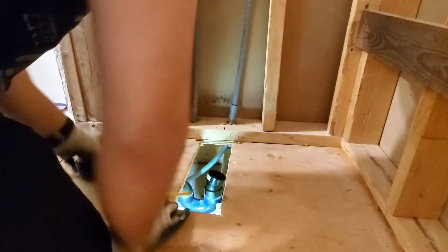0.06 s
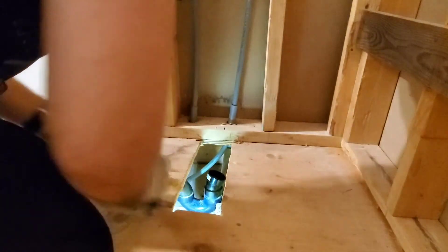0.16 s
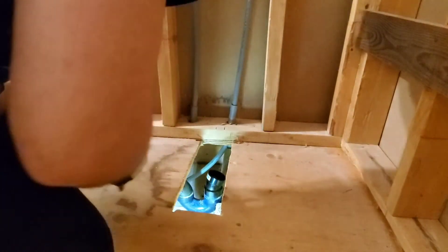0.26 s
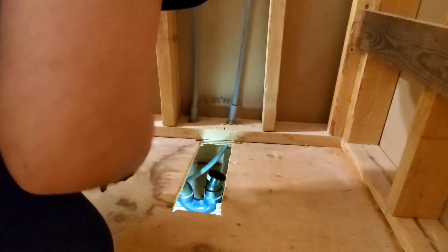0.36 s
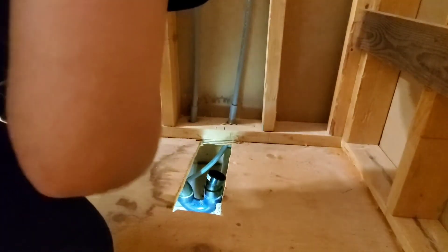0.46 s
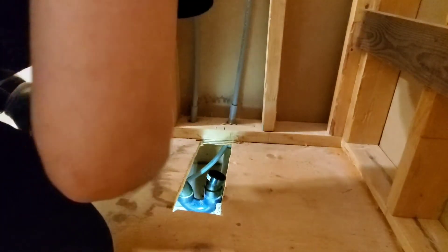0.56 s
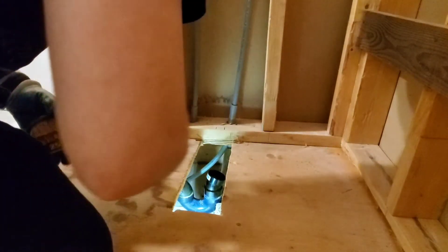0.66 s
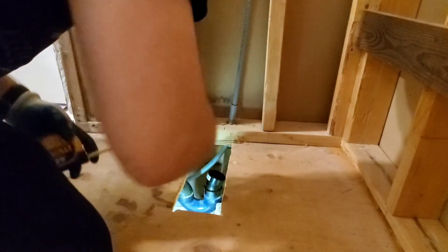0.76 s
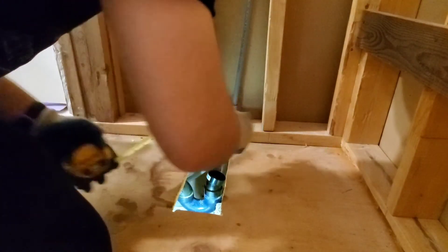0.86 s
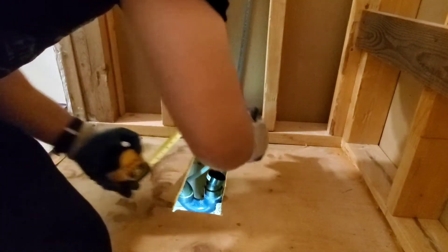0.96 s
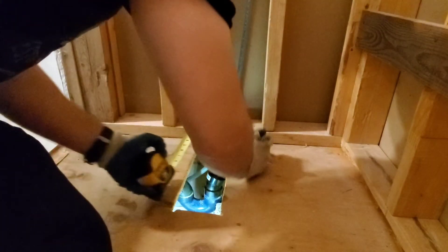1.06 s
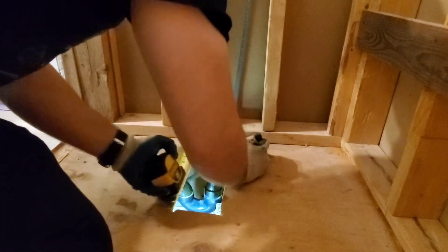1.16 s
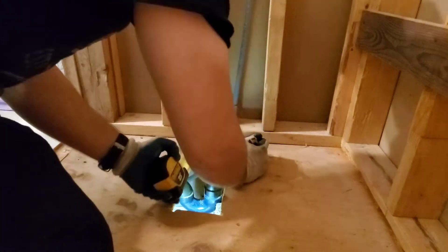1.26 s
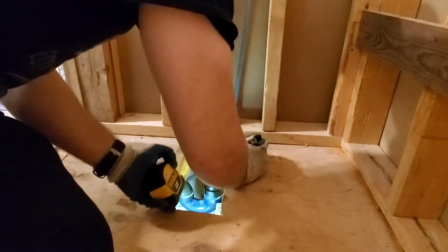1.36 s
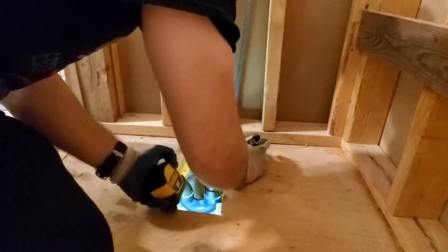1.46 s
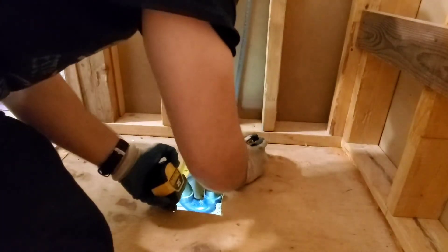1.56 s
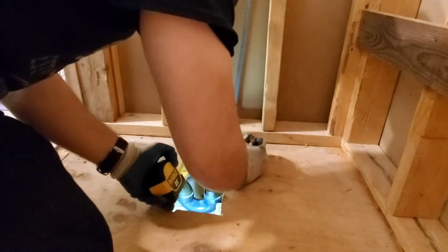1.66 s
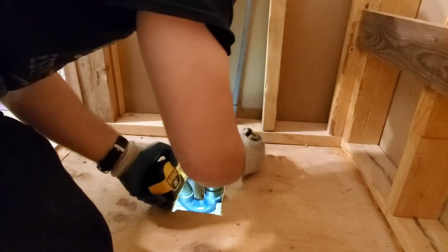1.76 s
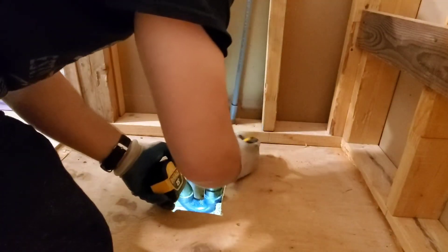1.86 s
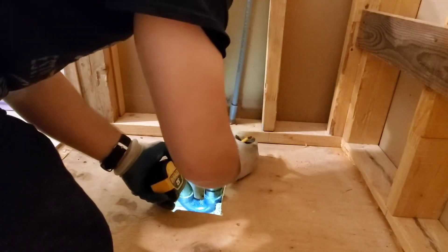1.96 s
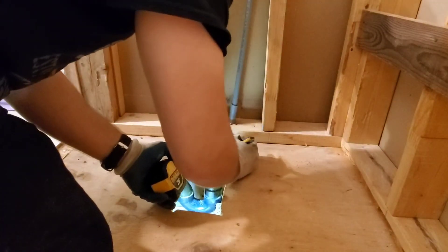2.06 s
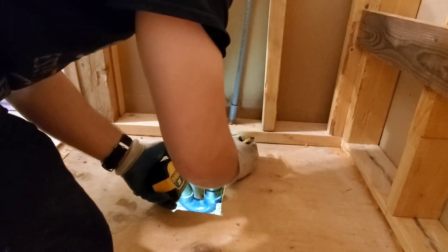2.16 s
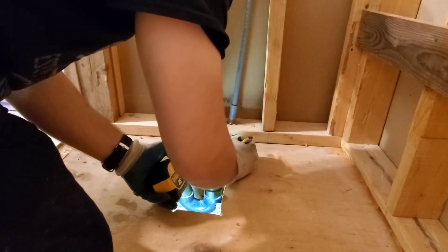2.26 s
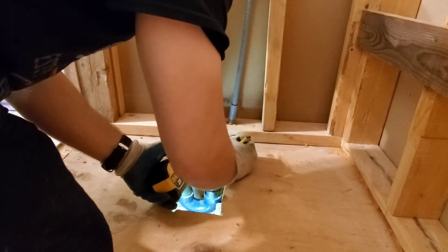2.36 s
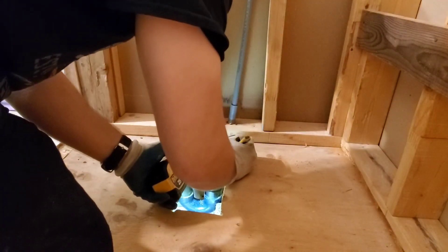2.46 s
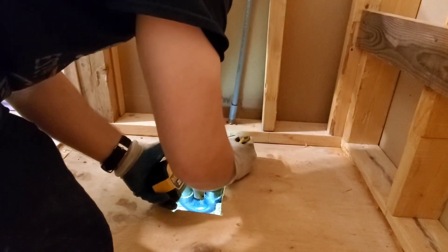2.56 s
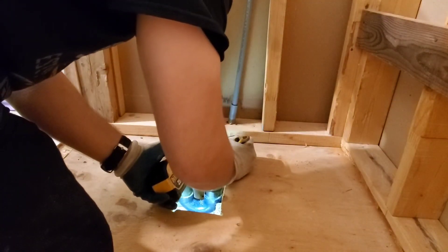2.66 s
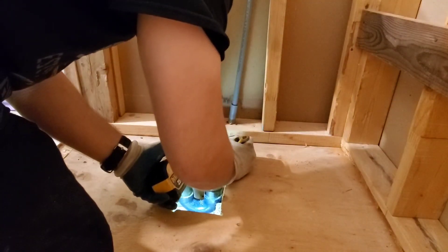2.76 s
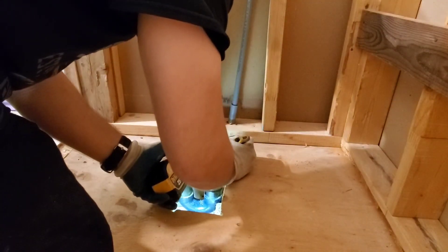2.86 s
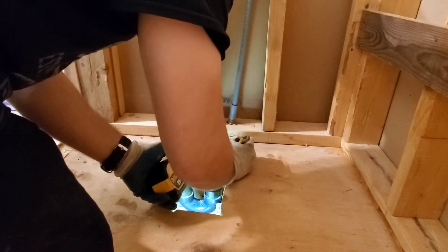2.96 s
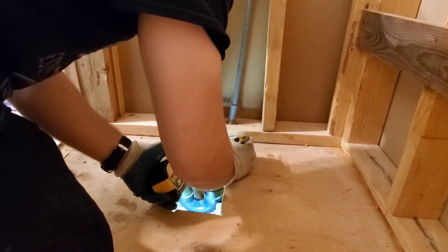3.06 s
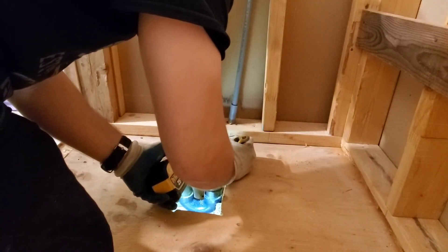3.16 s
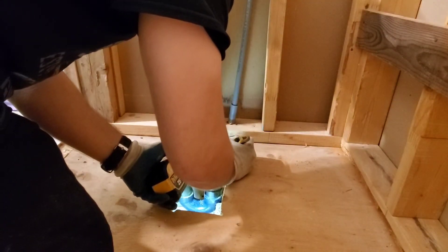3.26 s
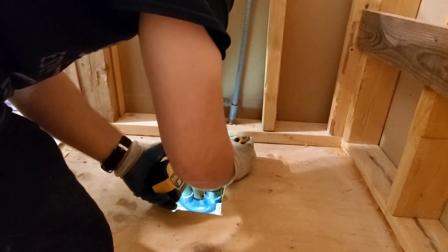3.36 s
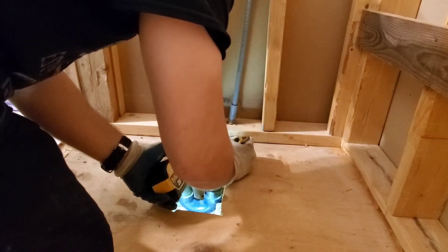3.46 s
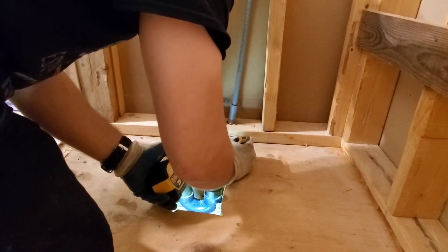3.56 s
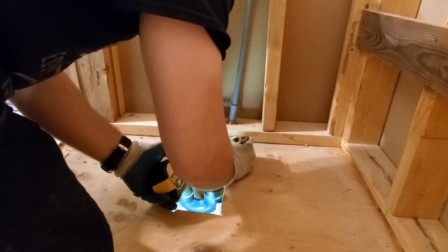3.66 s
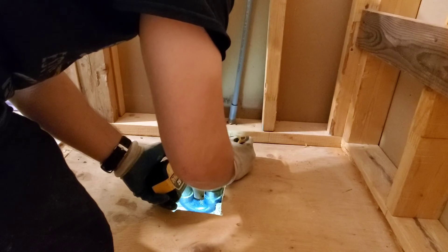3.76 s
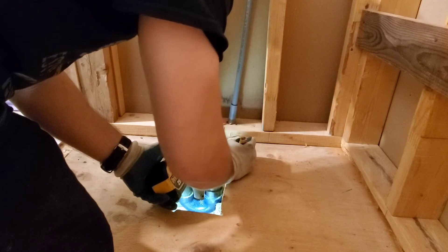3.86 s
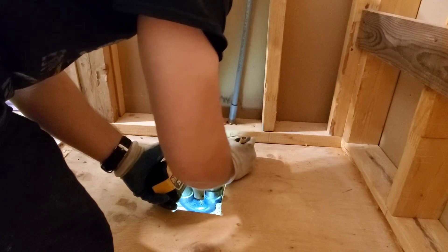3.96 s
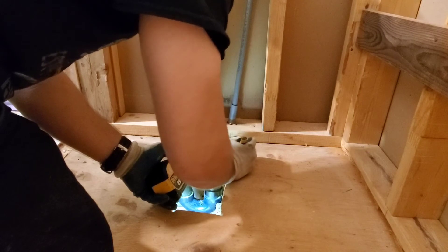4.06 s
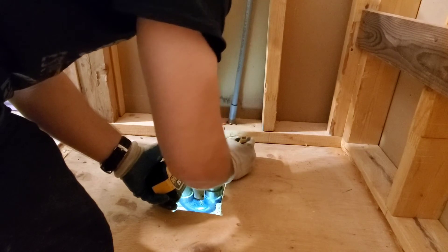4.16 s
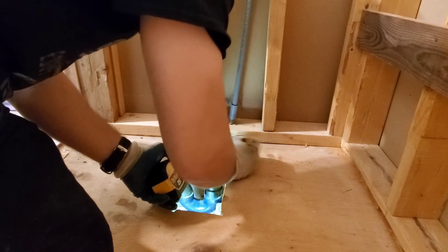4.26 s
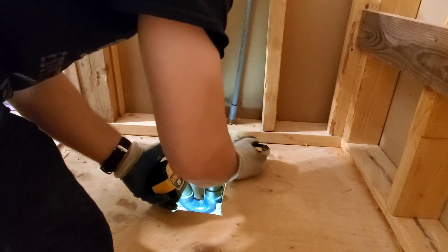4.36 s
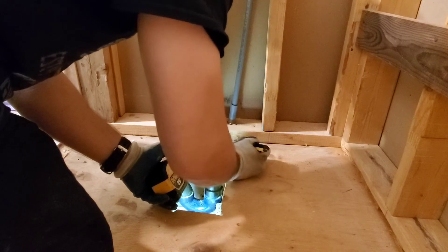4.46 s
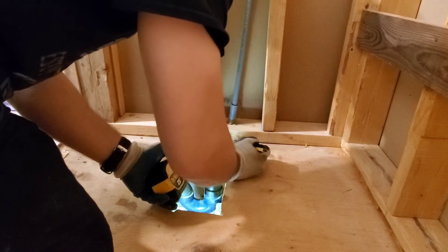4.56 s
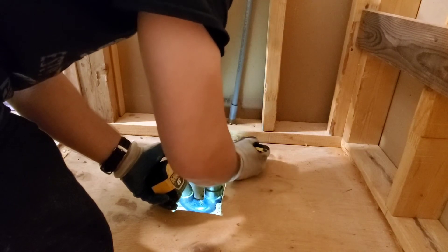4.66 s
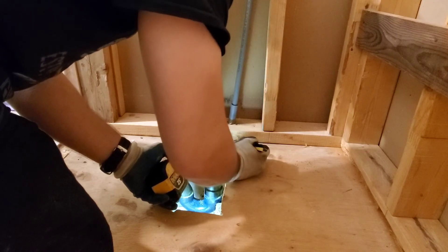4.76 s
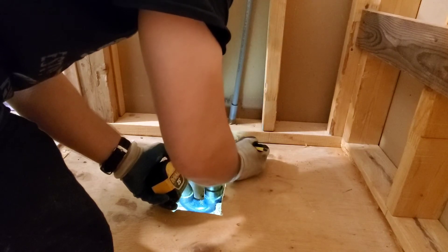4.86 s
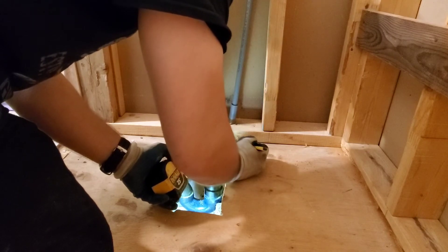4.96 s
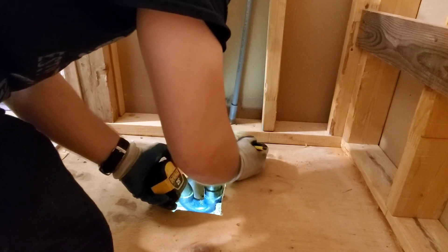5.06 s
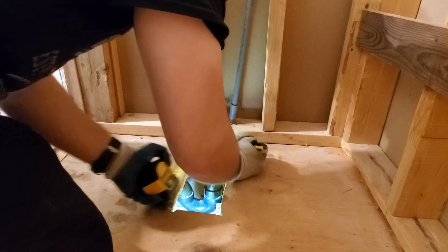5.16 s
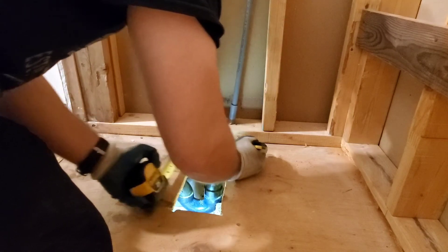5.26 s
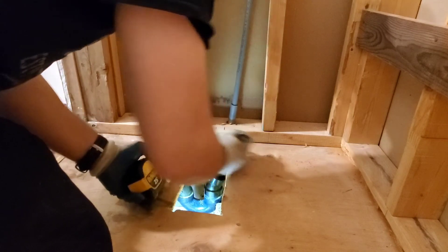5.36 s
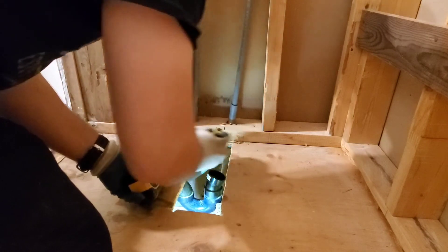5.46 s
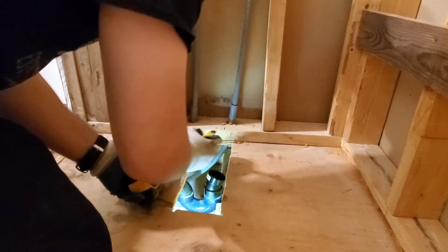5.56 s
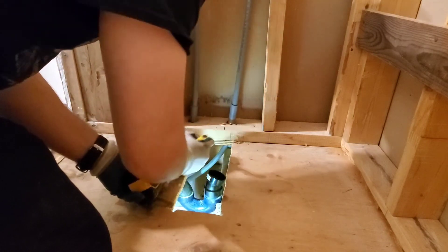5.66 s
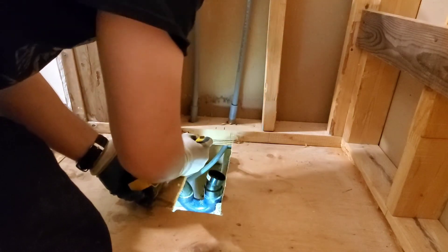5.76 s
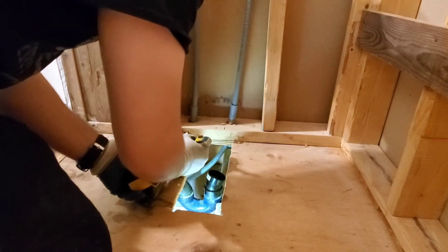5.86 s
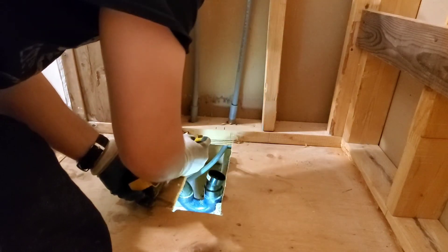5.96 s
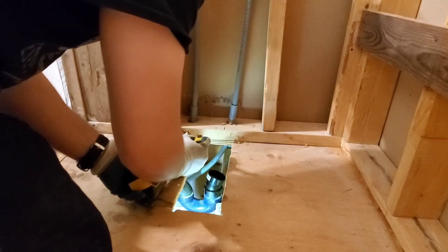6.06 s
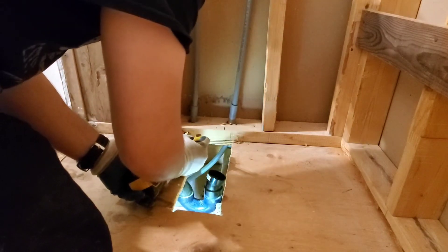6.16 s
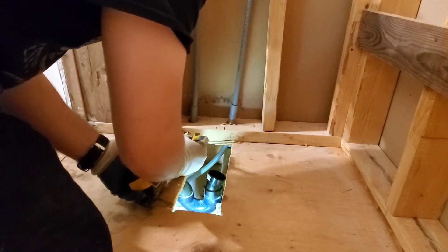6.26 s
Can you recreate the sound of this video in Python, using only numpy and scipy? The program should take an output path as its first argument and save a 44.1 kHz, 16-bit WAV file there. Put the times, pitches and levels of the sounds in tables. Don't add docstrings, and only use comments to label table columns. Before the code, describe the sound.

Steel tape measure scrapes and clicks against a hollow plastic pipe and wooden floor, then faint glove rubs, a hard knock and low floor thuds.

```python
import sys
import numpy as np
from scipy import signal
from scipy.fft import rfft, irfft
from scipy.io import wavfile
from scipy.ndimage import uniform_filter1d

SR = 44100
rng = np.random.default_rng(int(sys.argv[2]) if len(sys.argv) > 2 else 0)


def wav_record(signal):
    frames = np.transpose(np.atleast_2d(signal))
    bounded = np.clip(frames, -1, 1)
    quanta = np.round(bounded * 32767).astype(np.int16)
    wavfile.write(sys.argv[1], SR, quanta)


def convert_level_to_amplitude(level_db):
    exponent = np.asarray(level_db, float) / 20
    return 10 ** exponent


N = 278347

# time of full load in s, length in s, level in dB.
LEANS = [(.09, 0.18, -51), (0.3, 0.21, -53), (0.708, 0.14, -55), (0.866, .1, -57), (0.997, 0.18, -53),
         (1.157, 0.08, -54.5), (1.29, 0.19, -56), (1.479, 0.06, -44), (1.592, 0.12, -44),
         (1.9, 0.42, -58.5), (2.089, 0.11, -55.5), (2.24, 0.26, -58), (2.635, 0.21, -53.5),
         (2.868, 0.19, -57.5), (3.061, .15, -58.5), (3.305, 0.42, -62.5), (3.679, .14, -55.5),
         (3.882, 0.086, -54), (4.052, 0.094, -51.5), (4.266, 0.28, -50), (4.61, 0.057, -53),
         (4.914, 0.057, -49.5), (5.04, 0.099, -59.5), (5.193, 0.35, -55), (5.422, 0.032, -35),
         (5.479, 0.1, -42.5), (5.605, 0.092, -54), (5.85, 0.23, -51), (5.988, 0.059, -49),
         (6.182, 0.37, -53.5)]
# time of full load in s, length in s, level in dB.
STEPS = [(0, 0.32, -41.5), (0.124, 0.17, -41.5), (0.856, 0.044, -55), (1.137, 0.12, -46),
         (1.482, 0.21, -45.5), (1.593, 0.12, -42.5), (1.764, 0.047, -53.5), (1.904, 0.15, -56.5),
         (2.002, 0.31, -65), (2.736, 0.13, -59), (2.999, .3, -72), (3.216, 0.16, -65.5), (3.9, 0.31, -70.5),
         (4.06, 0.4, -64.5), (4.256, 0.31, -64.5), (4.618, .08, -68), (4.968, 0.26, -66.5),
         (5.171, 0.17, -58.5), (5.267, 0.22, -49.5), (5.358, 0.19, -52), (5.471, 0.05, -41.5),
         (5.74, 0.058, -44.5), (5.987, 0.16, -66), (6.185, 0.31, -68), (6.31, 0.17, -50)]
# frequency in Hz, width in Hz, level in dB.
JOISTS = [(64.5, 8.1, 3.5), (75.04, 5, 11), (88, 6.7, 0.5)]
# frequency in Hz, width in Hz, level in dB.
BOARDS = [(138, 19, -4), (161, 6.9, -3.5), (197.5, 8.5, -6.5), (265.9, 60, -12)]
# start in s, frequency in Hz, peak in dB, T60 in s.
FLOOR_SWINGS = [(.001, 161.3, -36.5, 0.39), (.13, 161, -35, 0.2), (1.452, 70.2, -34, .8),
                (1.465, 159.8, -42, .4), (1.551, 65.4, -35.5, 0.42), (1.556, 156.4, -37, 0.26),
                (2.712, 200, -57, .08), (1.6, 72, -47, .5), (4.242, 74.4, -42, 0.36),
                (5.404, 131, -29, 0.16), (5.407, 60.2, -32, 0.42), (5.714, 165.4, -43.5, 0.2),
                (6.275, 165, -47.5, 0.32)]
# start in s, frequency in Hz, peak in dB, T60 in
# s.
LOOSE_RINGS = [(.131, 675, -36.5, 0.055), (0.188, 2620, -31, 0.08), (0.186, 310, -34, 0.2),
               (.327, 440, -40.5, 0.1), (0.34, 365, -43.5, 0.3), (.33, 2160, -52.5, 0.29),
               (0.36, 438, -43, 0.18), (0.61, 460, -54.5, 0.4), (0.646, 575, -55, 0.33),
               (.66, 650, -53.5, 0.38), (0.806, 370, -47, 0.4), (0.804, 425, -33, 0.17),
               (0.964, 3700, -38, 0.08), (1.015, 14800, -37, 0.02), (1.132, 1628, -35.5, 0.2),
               (1.1325, 3420, -22, 0.031), (1.133, 770, -45.5, 0.3), (1.15, 1055, -45.5, 0.29),
               (1.555, 426, -36, 0.1), (1.553, 3000, -31, 0.05), (2.75, 365, -56.5, 0.25),
               (5.4035, 3170, -31, 0.077), (5.404, 399.4, -41.5, 0.19), (5.406, 1060, -42, 0.36),
               (5.72, 354, -53, 0.38), (5.731, 1950, -49.5, 0.075), (5.732, 2470, -50, 0.14),
               (5.734, 5200, -61, .03), (5.8638, 1900, -61.5, 0.055), (5.35, 1500, -56, .2),
               (5.292, 3790, -56, .12), (5.405, 1590, -36.5, 0.068), (5.416, 11200, -36.5, 0.042),
               (5.405, 770, -45, 0.18), (.19, 510, -38, 0.093), (.05, 360, -47, 0.13),
               (1.553, 4450, -30, 0.08), (1.288, 4050, -36, 0.05), (1.133, 305, -40, .15),
               (1.19, 360, -48.5, 0.295), (1.553, 5300, -28, .05), (.96, 430, -53, 0.26),
               (.85, 600, -49, .2), (5.406, 290, -42.5, .2), (4.24, 315, -59.5, 0.31),
               (3.87, 330, -65.5, 0.36), (2.718, 330, -57, .12), (1.56, 340, -42, .2),
               (.964, 15300, -38, .03), (5.404, 3900, -30, .05), (1.555, 5700, -42, .2),
             (1.47, 2150, -48, .12), (1.775, 1650, -57, .12), (1.556, 1050, -41, .17),
             (.189, 2050, -35, .06), (1.133, 3850, -31, .05), (.188, 950, -36, .1), (.805, 750, -43, .12),
             (.085, 1350, -50, .15)]
# time of full pressure in s, swell in s, fade in s, scrape in dB,
# hiss in dB re scrape.
TOOL_STROKES = [(.06, .3, .3, -68.5, 5), (0.213, 0.21, 0.056, -43, -4.5), (.368, 0.36, 0.14, -61, -5),
                (0.519, 0.17, 0.11, -70, 0), (.62, 0.034, 0.5, -57.5, 1), (.7, 0.074, 0.45, -54, 0.5),
                (.77, 0.16, 0.24, -53, 3.5), (0.86, 0.17, 0.17, -44, 5), (.95, 0.27, 0.087, -61.5, -4),
                (1.1, 0.068, 0.04, -69.5, -17.5), (1.17, 0.052, 0.15, -50, -1),
                (1.33, .03, 0.18, -60.5, 5.5), (1.41, .05, 0.079, -65, 3), (1.49, 0.024, .4, -61, 3),
                (1.633, 0.33, 0.044, -52, 1), (1.787, 0.26, 0.13, -63, -1.5), (1.9, 0.18, 0.11, -71, 3.5)]
# time of full pressure in s, swell in s, fade in s, scrape in dB,
# hiss in dB re scrape.
GLOVE_STROKES = [
    (2.265, 0.21, 0.082, -82.5, -13.5),
    (2.73, 0.053, .1, -96, -16),
    (3.865, .03, 0.12, -71, 0),
    (3.91, 0.076, 0.082, -67, -2.5),
    (4.022, 0.085, 0.11, -68, -3),
    (4.15, 0.048, 0.099, -67.5, -1.5),
    (4.248, 0.074, 0.12, -63, -3.5),
    (4.37, 0.088, 0.095, -67.5, -6.5),
]
# time of full pressure in s, swell in s, fade in s, scrape in dB,
# hiss in dB re scrape.
PULL_STROKES = [
    (5.165, 0.027, 0.13, -65, -4.5),
    (5.25, 0.055, 0.13, -64, -1),
    (5.3, 0.06, .1, -60.5, -3.5),
    (5.35, 0.12, 0.077, -57.5, -2.5),
    (5.39, 0.042, 0.044, -62, -2),
    (5.44, .06, 0.098, -45, -5.5),
    (5.52, .05, .1, -62, -6),
    (5.722, 0.016, .03, -69, -12),
    (5.744, 0.033, 0.073, -58, -17),
    (5.801, 0.065, 0.12, -68.5, -16),
]
# time of full pressure in s, swell in s, fade in s, level in dB.
PIPE_SHAKES = [(.225, 0.59, 0.18, -39), (.4, .3, 0.5, -60.5), (.696, 0.048, 0.21, -54),
               (.95, 0.12, 0.14, -42.5), (1.15, 0.03, 0.13, -38), (1.25, 0.32, 0.23, -64),
               (1.63, 0.33, 0.13, -48), (1.7, 0.17, 0.31, -48), (1.95, 0.34, 0.18, -66.5),
               (2.264, 0.28, 0.13, -60), (2.73, 0.03, 0.17, -68), (3.896, .1, 0.11, -60.5),
               (4.022, 0.07, 0.17, -61), (4.17, .1, 0.36, -63), (4.248, 0.042, 0.15, -51.5),
               (4.564, 0.028, 0.23, -67.5), (5.289, 0.072, 0.44, -53.5), (5.42, .02, 0.13, -35.5),
               (5.53, 0.22, 0.064, -60.5), (5.74, 0.045, 0.16, -53.5), (5.95, 0.32, 0.46, -64.5)]
# time in s, left-right difference in dB.
HANDS = [
    (0, 2),
    (.55, 8),
    (.8, 2.5),
    (1.2, 7.5),
    (1.6, 6),
    (2.3, 10),
    (4.1, 7.5),
    (5.3, 6.5),
    (5.5, 8),
]
# frequency in Hz, density in dB per Hz.
CASE_COLOUR = [(530, -26), (900, -19), (981, -5), (1170, -10.5), (1350, -10.5), (1710, -4.5), (2630, -2.5),
               (2870, -6), (7000, -25), (9100, -37), (15400, -120)]
# frequency in Hz, density in dB per Hz.
BLADE_COLOUR = [(530, -37.5), (900, -13.5), (1510, -11.5), (1630, -11), (2840, -2.5), (3150, -1),
                (4080, -7), (5180, -11.5), (5900, -8.5), (7000, -12), (9100, -47), (15400, -120)]
# frequency in Hz, density in dB per Hz.
GLOVE_COLOUR = [(800, -24), (1200, -19), (1650, -0.5), (1900, -3.5), (2150, -2), (2550, -5), (3000, -12),
                (4000, -15), (6000, -17), (8000, -39.5)]
# frequency in Hz, density in dB per Hz.
PULL_COLOUR = [(500, -22), (1160, -5), (1550, -4), (2390, -2), (3100, 2), (3700, -4), (4500, -8.5),
               (6000, -13), (7500, -17.5), (10000, -40)]
# frequency in Hz, density in dB per Hz.
BLADE_HISS = [(4000, -22), (5500, -2.5), (6500, -3), (7500, -10.5), (9500, -5), (12000, -2), (13800, -4),
              (15500, -0.5)]
# frequency in Hz, density in dB per Hz.
GLOVE_HISS = [(4000, -11), (5500, -2), (7500, -9.5), (8600, 0), (9600, -3.5), (12000, -2), (13800, -3),
              (15500, -1)]
# frequency in Hz, width in Hz, level in dB.
PIPE = [(324, 27, -31), (417, 180, 5.5), (570, 270, 0.5), (745, 160, 9), (872.6, 390, -4.5), (1310, 200, 4)]
# frequency in Hz, width in Hz, level in dB.
BLADE = [(1630, 60, -8), (2150, 100, -3), (3150, 450, -3), (5500, 300, -6)]
# start in s, peak in dB, hollow knock in dB re peak,
# left-right difference in dB.
BUMPS = [
    (.131, -31, 0.9, 5.5),
    (.189, -29, 0, 12.5),
    (.327, -48.5, 5, 0),
    (.806, -30, -9, 7),
    (2.72, -80, 5.5, 2.5),
    (4.562, -74.5, 9, 4),
    (5.722, -55, 7, 3),
    (5.863, -70, 1.5, 11),
    (6.279, -74, 13, 5),
]
# start in s, peak in dB, crack centre in Hz, bright tick in dB re peak,
# left-right difference in dB.
CLICKS = [(0.583, -52, 3100, -17, 6), (.5975, -41, 3270, -5, 8), (.6605, -43, 2205, -14, 4),
          (0.795, -36, 3390, -30, 12), (0.942, -34, 2760, -9, 2), (.9643, -31.5, 3170, -20, 9.5),
          (1.0155, -39, 2663, -4, 7.5), (1.12, -35, 2734, -17, 8), (1.132, -25, 3700, -10.5, 0),
          (1.288, -28, 4000, -7, 5), (1.387, -33, 4000, -13.5, 10.5), (1.469, -39, 3340, -10, 3),
          (1.485, -41.5, 4983, -4, 0), (1.522, -27, 3700, -10, 1.2), (1.5535, -17, 4500, -8.5, 1),
          (1.773, -42, 2170, -10.5, 1), (5.1525, -46.5, 3910, -22, 6), (5.241, -53.5, 3184, -10, 0),
          (5.2914, -47.5, 3870, -13, 1), (5.403, -22.5, 3600, -12.5, 4.5), (5.408, -29.5, 3300, -16, 3),
          (5.417, -35.5, 3270, -8, -1), (5.71, -61.5, 3080, -10.5, 4), (5.7315, -39, 2320, -31.5, 4),
          (5.759, -50, 2350, -25, 4)]
# time of full pressure in s, swell in s, fade in s, frequency in Hz,
# level in dB.
SONGS = [(.62, .04, .4, 3150, -60), (.71, .1, .12, 3250, -57), (.797, .04, .15, 3120, -47),
         (.67, .06, .1, 6200, -59), (.74, .08, .08, 5900, -57), (.865, .06, .1, 5470, -46),
         (.77, .08, .08, 12300, -54), (.85, .05, .1, 8900, -54), (.88, .1, .07, 3320, -52),
         (.885, .1, .06, 11900, -52), (.67, .05, .15, 2200, -58), (2.15, .05, .1, 1600, -78),
         (2.24, .15, .1, 1650, -73), (5.48, .03, .06, 1090, -48), (3.88, .07, .14, 1950, -68),
         (3.9, .08, .07, 2300, -71), (3.9, .08, .12, 1660, -74), (4.01, .07, .09, 2100, -69),
         (4.137, .03, .09, 2130, -65), (4.24, .05, .08, 2250, -67)]
# frequency in Hz, density in dB per Hz.
ROOM_TONE = [(60, -33), (100, -5.5), (125, -21), (200, -17.5), (260, -29), (330, -26), (590, -32.5),
             (750, -25.5), (1250, -37.5), (2500, -38), (5000, -47.5), (8500, -54), (12500, -43),
             (16000, -44)]
# frequency in Hz, left-right likeness from 0 to 1.
LIKENESS = [(100, 0.97), (160, 0.95), (300, 0.55), (500, .4), (1000, 0.052), (4000, 0.034)]
# frequency in Hz, T60 in s.
ROOM_T60 = [(125, 0.086), (500, 0.29), (2000, 0.26), (6000, 0.27), (14000, 0.22)]

DRAG_S, GLOVE_S, PULL_S = (.57, 5.7), (2.0, 4.9), (5.0, 5.7)
PULL_FADE_S = .13
SWELL_DB = 20
HISS_STEEPER = 1.266
LEAN_SWELL, STEP_SWELL = .9, 0.11
JOIST_REST_DB, BOARD_REST_DB = -78, -79.5
FLOOR_PAN_DB = 1.8
BLADE_RING_DB = -11
PIPE_LOW_HZ = 290
CHATTER_S = .0031
CLICK_KNOCK_DB = -21
BUMP_HZ, BUMP_TICK_DB = 2660, -20.5
CLICK_EDGE_DB = -11.5
FREE_S, FREE_EDGE_DB = (1.25, 1.6), -3
STRUCK_SHARE, RATTLE_SHARE = 0.89, 0.6
THIN_HZ, THIN_STRUCK_SHARE, THIN_RATTLE_SHARE = 650, .35, 1.
SONG_Q = 15
ROOM_TONE_DB = -75.5
MIC_LOW_HZ, EDGE_HZ, CUTOFF_HZ = 52.3, 15950, 16900


def butter(order, hz, kind, x):
    return signal.sosfilt(signal.butter(order, hz, kind, fs=SR, output="sos"), x)


def rms_one(x):
    return x / np.sqrt(np.mean(x ** 2) + 1e-20)


def at_hz(points, hz):
    table_hz, values = np.transpose(points)
    return np.interp(np.log(hz + 1), np.log(table_hz), values)


def colour(x, spectrum):
    n = x.shape[-1]
    gain = convert_level_to_amplitude(at_hz(spectrum, np.fft.rfftfreq(n, 1 / SR)))
    return rms_one(irfft(rfft(x) * gain, n))


def diffuse(length):
    mid, side = rfft(rng.standard_normal((2, length)))
    alike = np.clip(at_hz(LIKENESS, np.fft.rfftfreq(length, 1 / SR)), -1, 1)
    return irfft(np.sqrt(1 + alike) * mid + np.sqrt(1 - alike) * side * [[1], [-1]], length)


def drift(rate):
    knots = rng.standard_normal(int(N / SR * rate) + 2)
    return np.interp(np.arange(N) / SR * rate, np.arange(len(knots)), knots)


def ring(x, hz, t60):
    r = convert_level_to_amplitude(-60 / (t60 * SR))
    w = 2 * np.pi * min(hz, .45 * SR) / SR
    return signal.lfilter([0, np.sin(w)], [1, -2 * r * np.cos(w), r * r], x + 1e-18)


def resonate(x, peaks):
    total = 0
    for hz, width, db in peaks:
        t60 = np.log(1000) / np.pi / width
        total = total + convert_level_to_amplitude(db) * rms_one(ring(x, hz, t60))
    return rms_one(total)


def grains(per_s, spread_db):
    sizes = convert_level_to_amplitude(spread_db * np.minimum(rng.exponential(1, N), 5)) * rng.choice([-1, 1], N)
    return sizes * (rng.random(N) < per_s / SR)


def spread(per_s, spread_db, alike):
    shared = alike * grains(per_s, spread_db)
    return shared + np.array([grains(per_s, spread_db), grains(per_s, spread_db)])


def pressure(s, swell, fade, level_db, steeper=1):
    t = np.arange(0, N + 32, 32)[:, None] / SR
    climbing = (s - t) / np.maximum(swell, .01)
    falling = (t - s) / np.maximum(fade, .01)
    away = np.maximum(climbing, falling)
    gain = np.sqrt(np.sum(convert_level_to_amplitude(level_db - SWELL_DB * steeper * away) ** 2, axis=1))
    return np.interp(np.arange(N) / SR, t[:, 0], gain)


def place(x, pan_db, lag):
    left, right = np.broadcast_to(x, (2, x.shape[-1]))
    late = np.interp(np.arange(len(right)) - lag, np.arange(len(right)), right)
    return np.array([left * convert_level_to_amplitude(pan_db / 2), late * convert_level_to_amplitude(-pan_db / 2)])


def floor():
    lean_s, lean_length, lean_db = np.transpose(LEANS)
    step_s, step_length, step_db = np.transpose(STEPS)
    leaning = convert_level_to_amplitude(JOIST_REST_DB) + pressure(lean_s, LEAN_SWELL * lean_length, lean_length, lean_db)
    stepping = convert_level_to_amplitude(BOARD_REST_DB) + pressure(step_s, STEP_SWELL * step_length, step_length, step_db)
    push = diffuse(N)
    joists = resonate(push, JOISTS)
    joist_lumps = np.sqrt(uniform_filter1d(np.mean(joists ** 2, axis=0), size=2600) + .05)
    boards = resonate(push, BOARDS)
    board_lumps = np.sqrt(uniform_filter1d(np.mean(boards ** 2, axis=0), size=1600) + .05)
    return leaning * rms_one(joists / joist_lumps ** .7) + stepping * rms_one(boards / board_lumps ** .6)


def rings():
    out, t = np.zeros((2, N + SR)), np.arange(SR) / SR
    for s, hz, peak_db, t60 in LOOSE_RINGS + FLOOR_SWINGS:
        at, loose = round(s * SR), hz > 250
        jolts = np.diff(rng.standard_normal(SR + 4000))
        rattle = rms_one(ring(jolts, hz, t60=np.clip(27.0 / hz, .015, .1))[-SR:])
        rattle = rattle / np.sqrt(np.average(rattle ** 2, weights=convert_level_to_amplitude(-60 * t / t60)))
        clean = np.sin(2 * np.pi * hz * t)
        if hz > THIN_HZ:
            swing = THIN_RATTLE_SHARE * rattle + THIN_STRUCK_SHARE * clean
        elif loose:
            swing = RATTLE_SHARE * rattle + STRUCK_SHARE * clean
        else:
            swing = clean
        mode = convert_level_to_amplitude(peak_db - 60 * t / t60) * (1 - np.exp(-t * hz / 1.2)) * swing
        out[:, at:at + SR] += place(mode, pan_db=6.0 if loose else 1.2, lag=4.7)
    return out[:, :N]


def strokes():
    s, swell, fade, scrape_db, hiss_db = np.transpose(TOOL_STROKES + GLOVE_STROKES + PULL_STROKES)
    fade = np.where(s > PULL_S[0], np.minimum(fade, PULL_FADE_S), fade)
    rubbing = pressure(s, swell, fade, scrape_db)
    hissing = pressure(s, swell, fade, scrape_db + hiss_db, HISS_STEEPER)
    shaking = pressure(*np.transpose(PIPE_SHAKES))
    t = np.arange(N) / SR
    pan_db = np.interp(t, *np.transpose(HANDS))
    gloved = (t > GLOVE_S[0]) & (t < GLOVE_S[1])
    dragging = (t < DRAG_S[0]) | (t > DRAG_S[1])
    pulling = (t > PULL_S[0]) & (t < PULL_S[1])
    slips = spread(1200, spread_db=1.0, alike=0.6125)
    fine = spread(5000, spread_db=0.5, alike=1.5)
    blade = 0
    for mode in BLADE:
        favour_db = 5 * np.minimum(drift(14), 1.2)
        blade = blade + convert_level_to_amplitude(mode[2] + favour_db) * resonate(slips, [mode])
    scrape = colour(slips, BLADE_COLOUR) + convert_level_to_amplitude(BLADE_RING_DB) * blade
    scrape = np.where(gloved, colour(slips, GLOVE_COLOUR), scrape)
    scrape = np.where(dragging, colour(slips, CASE_COLOUR), scrape)
    scrape = np.where(pulling, colour(slips, PULL_COLOUR), scrape)
    hiss = np.where(gloved, colour(fine, GLOVE_HISS), colour(fine, BLADE_HISS))
    pipe = resonate(spread(800, spread_db=2.5, alike=0.99), PIPE)
    pipe = butter(4, PIPE_LOW_HZ, "high", pipe)
    judder = convert_level_to_amplitude(np.where(gloved, .8, 3.0) * np.clip(drift(60), -2, 1.6))
    near = judder * (convert_level_to_amplitude(2.5) * rubbing * scrape + convert_level_to_amplitude(5.5) * hissing * hiss + convert_level_to_amplitude(-9.5) * shaking * pipe)
    return place(near, pan_db, lag=11.0)


def contact(peak_db, hz, tick_db, knock_db, edge_db):
    length = 4000
    t = np.arange(length) / SR
    chatter = rng.standard_normal((3, length)) * np.sqrt(rng.exponential(1, length))
    chatter = chatter * (1 - np.exp(-t / .0005)) * np.exp(-t / CHATTER_S)
    impulse = np.broadcast_to(1. * (t == 0), chatter.shape)
    blows = np.stack([chatter, impulse], axis=1)
    crack = butter(2, [0.59 * hz, 1.396 * hz], "band", blows[0])
    tick = butter(2, 10000, "high", blows[1])
    knock = np.array([resonate(blow, PIPE) for blow in blows[2]])
    edge = butter(2, [5000, 9000], "band", blows[1])
    levels_db = [(-9, -14), (tick_db + 4.5, tick_db - 3.5),
                 (knock_db - 4.5, knock_db - 4.5), (edge_db, edge_db - 7.0)]
    hit = 0
    for level_db, part in zip(levels_db, [crack, tick, knock, edge]):
        unit = part / np.sqrt(np.sum(part ** 2, axis=1, keepdims=True))
        hit = hit + convert_level_to_amplitude(level_db)[:, None] * unit
    return convert_level_to_amplitude(peak_db + 22.5) * hit


def clicks():
    near, far = np.zeros((2, N + 4000)), np.zeros(N + 4000)
    contacts = [(s, db, hz, tick, CLICK_KNOCK_DB, pan) for s, db, hz, tick, pan in CLICKS]
    contacts += [(s, db, BUMP_HZ, BUMP_TICK_DB, knock, pan) for s, db, knock, pan in BUMPS]
    for s, peak_db, hz, tick_db, knock_db, pan_db in sorted(contacts):
        free = FREE_S[0] < s < FREE_S[1]
        edge_db = tick_db + (FREE_EDGE_DB if free else CLICK_EDGE_DB)
        hit = contact(peak_db, hz, tick_db, knock_db, edge_db)
        at = round((s - .001) * SR)
        span = slice(at, at + hit.shape[1])
        near[:, span] += place(hit[0], pan_db, lag=rng.uniform(-18.5, 15))
        far[span] += hit[1]
    return near[:, :N], far[:N]


def songs():
    slips, out = spread(1500, spread_db=2.0, alike=1.0), 0
    for s, swell, fade, hz, level_db in SONGS:
        mode = [(hz, hz / SONG_Q, 0)]
        narrow = resonate(resonate(slips, mode), mode)
        out = out + pressure(s, swell, fade, level_db) * narrow
    return place(out, pan_db=6.0, lag=9.0)


def room(x):
    length = 26000
    edges = 90 * 2 ** np.arange(0, 8.)
    t, white, tail = np.arange(length) / SR, diffuse(length), 0
    for low, high in zip(edges, np.minimum(2 * edges, 20000)):
        band = butter(2, [low, high], "band", white)
        tail = tail + band * convert_level_to_amplitude(-60 * t / at_hz(ROOM_T60, np.sqrt(low * high)))
    tail = tail * (1 - np.exp(-(t / 0.0088) ** 2))
    tail = tail / np.sqrt(np.sum(tail ** 2) / 2)
    wet = signal.fftconvolve(x.mean(axis=0)[None], tail, axes=1)[:, :N]
    return wet * convert_level_to_amplitude(np.array([[1.5], [-1.5]]))


def scene():
    modes = rings()
    rubs = strokes() + songs()
    hits, hits_far = clicks()
    tone = convert_level_to_amplitude(ROOM_TONE_DB + 4.5 + 0.36 * drift(3.6)) * colour(diffuse(N), ROOM_TONE)
    reverb = room(convert_level_to_amplitude(-4.5) * rubs + convert_level_to_amplitude(7.0) * hits_far + convert_level_to_amplitude(-5.5) * modes)
    return rubs + hits + modes + reverb + place(floor() + tone, FLOOR_PAN_DB, lag=0)


def low_pass(x):
    return signal.sosfilt(signal.butter(12, 16800, fs=SR, output="sos"), x)


def record(dry):
    thin = butter(3, MIC_LOW_HZ, "high", dry)
    shelf = signal.sosfilt(signal.cheby2(8, 22, EDGE_HZ, fs=SR, output="sos"), thin)
    cut = signal.sosfilt(signal.cheby2(12, 60, CUTOFF_HZ, fs=SR, output="sos"), shelf)
    return low_pass(cut)


dry = scene()
out = record(dry)
wav_record(out)
```